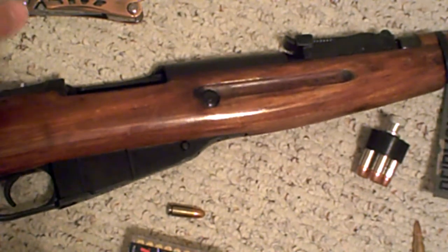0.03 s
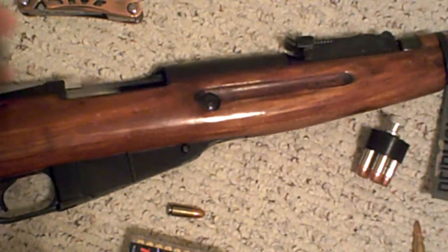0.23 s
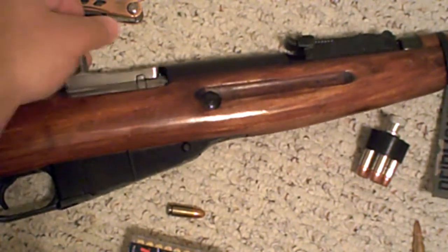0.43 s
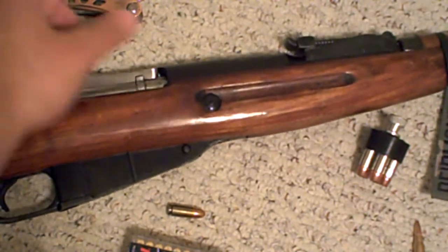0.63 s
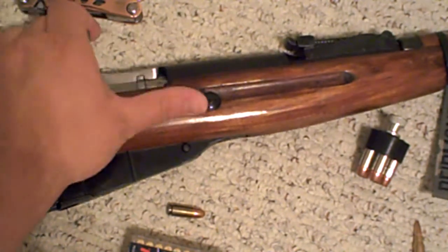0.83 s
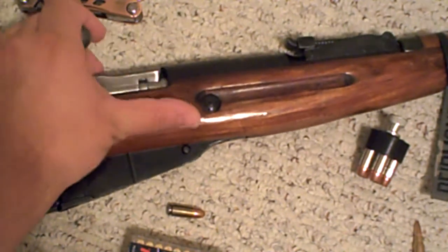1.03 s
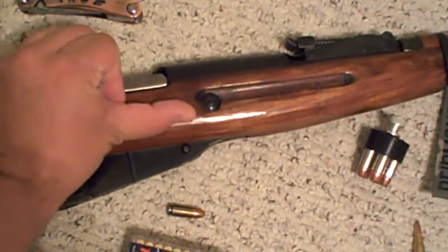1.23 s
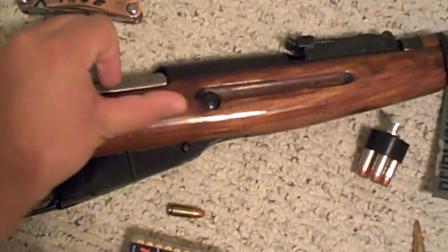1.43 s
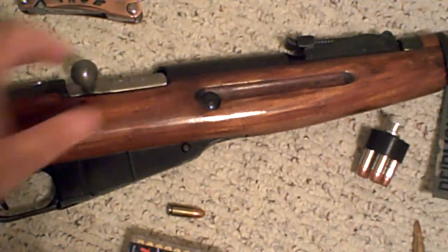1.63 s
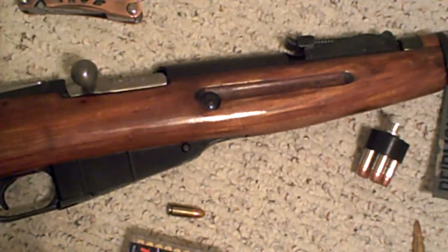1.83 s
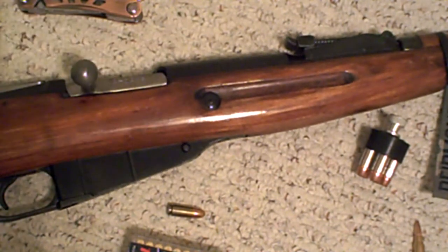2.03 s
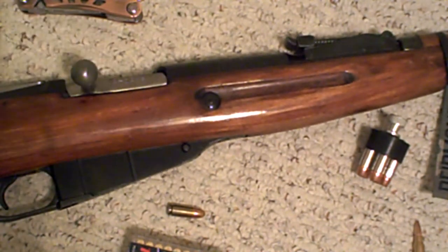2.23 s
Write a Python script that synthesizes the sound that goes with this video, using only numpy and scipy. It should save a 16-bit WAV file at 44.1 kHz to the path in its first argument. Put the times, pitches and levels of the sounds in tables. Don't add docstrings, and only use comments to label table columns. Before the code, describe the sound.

A steel rifle bolt slides with a quick clatter, sharp double knock, then locking clacks

```python
import sys
import numpy as np
from scipy import signal
from scipy.fft import rfft, irfft, next_fast_len
from scipy.io import wavfile
from scipy.ndimage import uniform_filter1d

SR = 44100
rng = np.random.default_rng(int(sys.argv[2]) if len(sys.argv) > 2 else 0)


def invert_db(level):
    return 10 ** (np.asarray(level, dtype=float) / 20)


def dump(signal):
    limited = np.clip(np.atleast_2d(signal).T, -1, 1)
    pcm = np.round(limited * 32767).astype(np.int16)
    wavfile.write(sys.argv[1], SR, pcm)


N = 100327
OFF_DB = -140
RISE_S = 0.00072


def unit(x):
    return x / np.sqrt(np.mean(x ** 2) + 1e-20)


def along(points, hz):
    f, v = np.transpose(points)
    return np.interp(np.log(hz + 1), np.log(f + 1), v)


def slope(tilt_db, hz):
    return tilt_db * np.log2(np.clip(hz, 1000, 16000) / 3000)


def causal(x, gain_db):
    m = next_fast_len(len(x) + 4096, real=True) // 2 * 2
    cepstrum = irfft(gain_db(np.fft.rfftfreq(m, 1 / SR)) * np.log(10) / 20, m)
    cepstrum[1:m // 2] *= 2
    cepstrum[m // 2 + 1:] = 0
    return irfft(rfft(x, m) * np.exp(rfft(cepstrum)), m)[:len(x)]


def damped(db, hz, t60_s, rise_s, t):
    return invert_db(db - 60 * t / t60_s) * np.sin(2 * np.pi * hz * t) * (1 - np.exp(-t / rise_s))


def ringing(hz, db, t60_s, t):
    scatter_db, drift = 2.5, 0.036
    chance = rng.standard_normal((len(hz), 3))
    pitch = hz[:, None] * (1 + drift * chance[:, :1])
    phase = 2 * np.pi * pitch * t + 10 * chance[:, 1:2]
    level_db = db[:, None] + scatter_db * chance[:, 2:] - 60 * t / t60_s
    return (invert_db(level_db) * np.sin(phase)).sum(0)


# start in seconds, peak in dB, brightness in dB per octave, stock knock in dB, t60 in seconds.
TOUCHES = [(.0718, -59, -7, -1, 0.043), (.113, -73, -5, -10.5, 0.018), (.1228, -49, -8, -14.5, 0.017),
           (.143, -60, 0, -11, 0.012), (.1745, -65, -7, 4.5, 0.026), (.187, -61.5, 0, 4, 0.02),
           (.5826, -53, -6, 5.5, 0.027), (.608, -45.5, -8.5, -4, 0.035), (.7045, -40.5, -5, -19, 0.04),
           (.708, -43.5, -4, -10, 0.055), (.722, -36, -8.5, -4, 0.03), (.7258, -28, 3, -8.5, .025),
           (.732, -35, 1.5, -10, 0.0081), (.7385, -43, 3.5, -11.5, 0.04), (.828, -50.5, -16.5, -4, 0.014),
           (.8342, -42, -8.5, -3, 0.03), (1.385, -70.5, -9.5, -3, 0.015), (1.545, -60, -8, -2, 0.025)]
RATTLE = [(.1985, -43.5, -1.5, -12, 0.019), (.2078, -39, -1, -9.5, .02), (.2165, -45, -4.5, -7.5, .02),
          (.2265, -39, -0.5, -10.5, .02), (.231, -42.5, -5.5, -10, .02), (.2376, -37.5, 0.5, -11.5, .015),
          (.2415, -38, -1.5, -16.5, .015), (.2445, -32.5, 2.5, -13.5, .012),
          (.2463, -25.5, -4.5, -6, 0.0082), (.2488, -35.5, -5.5, -3, .02), (.2595, -46, 6.5, -8, .015),
          (.2635, -43, 4.5, -10.5, .012), (.267, -42.5, -9, -9.5, .015), (.2725, -49.5, 6, -12, .01),
          (.2858, -36.5, -2, -17, .015), (.2925, -41, -1, -0.5, .015), (.2975, -38.5, -1, -13, .012),
          (.3, -30, -1.5, -7, .018), (.3055, -35.5, -4, -10.5, .02), (.3095, -36.5, -4.5, -9, .02),
          (.3155, -33, 1, -14.5, 0.02204), (.319, -37, 1, -4.5, .02), (.3245, -41.5, -6, -14, .02),
          (.3325, -36.5, 2, -6, .015), (.338, -41.5, -11, -8, .015), (.3462, -33.5, 4, -20, 0.0092)]
KNOCKS = [
    (0.3629, -14.5, 3, -21.5, 0.0079),
    (0.3669, -29.5, 1.2, -12.5, 0.032),
    (0.374, -25, 0, -7.5, 0.028),
    (.3795, -31, -1.5, -10.5, 0.045),
    (0.3865, -28.5, 3, -23.5, 0.018),
    (.413, -12, 0, -19.5, 0.026),
    (0.4163, -27.5, 3, -18.5, 0.027),
    (0.4223, -25.5, 0.5, -1.5, 0.026),
]
LOCKING = [(.9958, -50, -6, -15, 0.035), (1.0032, -36.5, -7.5, -18, 0.01), (1.0092, -33.5, -1, -24, 0.0099),
           (1.0115, -11.5, -0.77, -14, 0.011), (1.0154, -18, -0.5, -12, 0.026), (1.138, -43, -7, -8, 0.013),
           (1.1405, -27, 0.5, -11, 0.019), (1.1465, -40, 3.5, 3, 0.03), (1.1618, -22.5, -4, -13, 0.018),
           (1.1718, -21.5, 8, -1.5, 0.0072), (1.174, -18, -1, -15, 0.016), (1.1785, -23.5, 4, -11, 0.017)]
# frequency in Hz, level in dB.
LOOSE_MODES = [(2360, 3), (2730, 0.5), (3700, 2.5), (4420, -0.5), (5300, 1), (6100, -18), (6800, -6),
               (7700, -3), (8800, -11.5), (10100, -5)]
SHUT_MODES = [(2250, 3), (2950, -1.5), (3660, 6), (4450, 6), (5100, 1), (5700, -3), (6400, -7.5),
              (7000, 4.5), (9200, -8), (10300, -2)]
# frequency in Hz, level in dB.
STOCK_MODES = [(640, -18), (850, -12), (1240, -4), (1450, -4), (1750, -6), (2200, -7)]
# frequency in Hz, density in dB per Hz.
CRACK = [(120, -44), (400, -22.5), (1500, -5), (4500, -2), (7000, -1), (10500, -10), (12000, -11.5),
         (16000, -22)]


def contacts(rows, body):
    crack_db, modes_db, hard_peak_db = -5, -17, -1.5
    steel_life, stock_life, stock_wet_db = 0.8, 1.1, -8.5
    spike_db, spike_lag_s = -17, 0.001
    out = np.zeros((2, N + SR))
    t = np.arange(SR // 8) / SR
    rise = 1 - np.exp(-(t / RISE_S) ** 2)
    steel_hz, steel_db = np.transpose(body)
    stock_hz, stock_db = np.transpose(STOCK_MODES)
    for start_s, db, tilt_db, knock_db, t60_s in rows:
        colour = lambda f: along(CRACK, f) + slope(tilt_db, f)
        steel = ringing(steel_hz, modes_db + steel_db + slope(tilt_db, steel_hz), steel_life * t60_s, t)
        stock = ringing(stock_hz, knock_db + stock_db, stock_life * t60_s, t) / 2 * rise
        crack = unit(causal(rng.standard_normal(len(t)), colour)) * invert_db(crack_db - 60 * t / t60_s)
        hard = (steel + crack) * rise
        hard = hard * invert_db(hard_peak_db) / np.abs(hard).max()
        click = unit(causal(1. * (t == 0), colour)) * np.std(hard)
        spike = invert_db(spike_db) * np.roll(click, round(spike_lag_s * SR))
        direct = hard + stock + spike
        spread = click + invert_db(stock_wet_db) * stock
        out[:, round(start_s * SR):][:, :len(t)] += invert_db(db) * np.array([direct, spread])
    return out[:, :N]


# start in seconds, level in dB, frequency in Hz, t60 in seconds.
NOTES = [(.229, -40, 2780, 0.014), (.246, -37.5, 2744, 0.036), (.2455, -39.5, 7660, 0.018),
         (.309, -44.5, 2660, .04), (.3625, -25.5, 4640, 0.017), (.3625, -25, 10300, 0.019),
         (.4135, -30.5, 1300, 0.034), (.4135, -31.5, 1525, 0.053), (.4135, -25.5, 1771, 0.041),
         (.4135, -34, 2924, 0.053), (.3745, -36.5, 5200, .03), (.383, -38, 8600, 0.022),
         (1.164, -36, 7200, 0.027), (.4135, -22.5, 5520, 0.029), (.7045, -50, 7630, 0.032),
         (.708, -46.5, 1910, .04), (.726, -38, 8820, .025), (.726, -36, 1713, 0.035),
         (.8345, -46, 2080, .025), (1.012, -47, 385, 0.05), (1.012, -37, 840, 0.039),
         (1.014, -29, 1493, 0.019), (1.012, -22.5, 2270, 0.021), (1.012, -29.5, 2880, 0.023),
         (1.0135, -28.5, 6440, 0.038), (1.012, -20, 6870, 0.016), (1.1405, -40.5, 1830, .025),
         (1.1405, -42, 2270, 0.029), (1.1405, -43, 10170, .015), (1.1625, -33, 2960, 0.034),
         (1.174, -37, 1677, 0.025), (1.174, -34, 2337, 0.046), (1.176, -51.5, 629, 0.17)]


def notes():
    out, t = np.zeros(N + SR), np.arange(SR // 4) / SR
    for start_s, db, hz, t60_s in NOTES:
        out[round(start_s * SR):][:len(t)] += damped(db, hz, t60_s, RISE_S, t)
    return out[:N]


# frequency in Hz, level in dB, t60 in seconds.
RINGS = [(6755, -6, .03), (10085, -4, .045), (10110, -28, .33), (14720, -27, .15)]
# start in seconds, level in dB, t60 scale, extra level of the top ring in dB.
RING_BLOWS = [
    (.304, -43, .9, -15),
    (.4175, -23, 1, 0),
    (1.0145, -28, .55, -25),
    (1.176, -39, .8, -25),
]


def bolt_ring():
    waver_db, waver_s = 2.5, 0.004
    out, t = np.zeros(N + SR), np.arange(SR // 2) / SR
    hz, ring_db, t60_s = np.transpose(RINGS)[:, :, None]
    for start_s, db, scale, top_db in RING_BLOWS:
        noise = rng.standard_normal((len(hz), len(t)))
        waver = unit(uniform_filter1d(noise, int(waver_s * SR), axis=1))
        level_db = ring_db + waver_db * waver + top_db * (hz == hz.max()) - 60 * t / (t60_s * scale)
        ring = invert_db(level_db) * np.sin(2 * np.pi * hz * t + waver / 2)
        out[round(start_s * SR):][:len(t)] += invert_db(db) * ring.sum(0) * (1 - np.exp(-t / RISE_S))
    return out[:N]


# time in seconds, level in dB.
SCRAPE = [(.17, -77.5), (.196, -70.5), (.21, -54.5), (.24, -49.5), (.275, -59.5), (.315, -46.5),
          (.355, -58.5), (.38, -44), (.41, -56.5)]


def scrape():
    slips_per_s, spread_db, width_hz, tilt_db = 2500, 4, 350, -3.5
    slips = (rng.random(N) < slips_per_s / SR) * rng.standard_normal(N)
    slips = slips * invert_db(spread_db * rng.standard_normal(N))
    f = np.fft.rfftfreq(N, 1 / SR)
    damping = 1j * f * width_hz
    body = 0
    for k, (hz, db) in enumerate(STOCK_MODES + LOOSE_MODES):
        body = body + (-1) ** k * invert_db(db) * damping / (hz * hz - f * f + damping)
    body = body * invert_db(slope(tilt_db, f))
    s, pressure_db = np.transpose(SCRAPE)
    pressure = invert_db(np.interp(np.arange(N) / SR, s, pressure_db, OFF_DB, OFF_DB))
    return unit(irfft(rfft(slips) * body, N)) * pressure


# time in seconds, pitch in Hz, level in dB.
PLATE = [(0.196, 1769, -68), (.2, 1652, -50), (.21, 1452, -46), (0.221, 1382, -47), (.228, 1319, -58.5),
         (0.251, 1230, -52), (.264, 1268, -53.5), (0.273, 1200, -72)]


def plate():
    roughness, width_hz, upper_ratio, upper_db = 0.45, 150, 1.75, -7
    s, hz, db = np.transpose(PLATE)
    t = np.arange(N) / SR
    phase = 2 * np.pi * np.cumsum(np.interp(t, s, hz)) / SR
    rough = unit(uniform_filter1d(rng.standard_normal((2, N)), int(SR / width_hz / 2), axis=1))
    lower = (1 + roughness * rough[0]) * np.sin(phase)
    upper = invert_db(upper_db) * rough[1] * np.sin(upper_ratio * phase)
    return (lower + upper) * invert_db(np.interp(t, s, db, OFF_DB, OFF_DB))


# start in seconds, level in dB, frequency in Hz.
THUDS = [
    (0.43, -58.5, 297.2),
    (0.734, -62.5, 217),
    (1.176, -57, 210),
]


def thuds():
    out, t = np.zeros(N + SR), np.arange(SR // 2) / SR
    for start_s, db, hz in THUDS:
        out[round(start_s * SR):][:len(t)] += damped(db, hz, 0.22, 0.0089, t)
    return out[:N]


# start in seconds, level in dB.
JOLTS = [
    (.3, -64),
    (0.362, -51.5),
    (0.411, -49),
    (.726, -63.5),
    (1.013, -60),
    (1.171, -64),
]


def jolts():
    jolt_s = 0.0023
    out, u = np.zeros(N), np.arange(SR // 10) / SR / jolt_s
    for start_s, db in JOLTS:
        out[round(start_s * SR):][:len(u)] += invert_db(db) * u * (2 - u) * np.exp(-u)
    return out


# frequency in Hz, t60 in seconds.
ROOM_T60 = [(200, 1), (530, .28), (1400, 0.32), (3700, 0.28), (7000, 0.29), (9700, 0.27), (15000, .22)]


def room(x):
    level_db, gap_s, tilt_db, air_db = -8.5, 0.009, -3, 2.5
    wet, first_half = np.zeros(N), np.arange(N) < 0.9 * SR
    for part in (first_half, ~first_half):
        hz, t, z = signal.stft(rng.standard_normal(SR // 2), SR, nperseg=256)
        colour_db = slope(tilt_db, hz) + air_db * (hz > 11000)
        decay_db = 60 * t / along(ROOM_T60, hz)[:, None]
        tail = signal.istft(z * invert_db(colour_db[:, None] - decay_db), SR, nperseg=256)[1]
        tail = tail * (1 - np.exp(-(np.arange(len(tail)) / SR / gap_s) ** 2))
        wet += signal.fftconvolve(x * part, tail / np.linalg.norm(tail))[:N]
    return invert_db(level_db) * wet


# frequency in Hz, density in dB per Hz.
HISS = [(12, -63), (20, -35), (150, -16), (330, -3.5), (1200, -6), (3300, -11), (6000, -17), (16000, -27)]


def hiss():
    return invert_db(-68.7) * unit(causal(rng.standard_normal(N), lambda f: along(HISS, f)))


# frequency in Hz, gain in dB.
MIC = [(30, -12.5), (300, 6), (3000, 5), (7000, 2.5), (9000, 2.46), (10500, 2.2), (12000, -9.5), (16000, 1)]


def scene():
    note_wet_db = -12.5
    action = contacts(TOUCHES + RATTLE + KNOCKS, LOOSE_MODES) + contacts(LOCKING, SHUT_MODES)
    action = action + bolt_ring() + scrape() + plate()
    near, spread = action + invert_db([[0], [note_wet_db]]) * notes()
    heard = causal(near + room(spread), lambda f: along(MIC, f))
    return (heard + jolts() + thuds() + hiss())[None]


def low_pass(x):
    return signal.sosfilt(signal.butter(12, 16520, fs=SR, output="sos"), x)


def record(dry):
    top_hz, drop_db = 15850, -28
    above = np.fft.rfftfreq(N, 1 / SR) > top_hz
    mix = irfft(rfft(dry) * invert_db(drop_db * above), N)
    return low_pass(mix)


dry = scene()
out = record(dry)
dump(out)
```